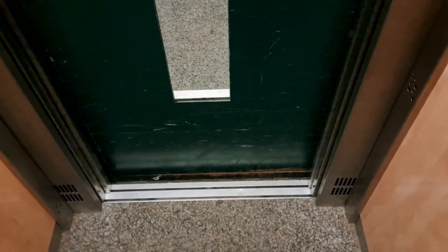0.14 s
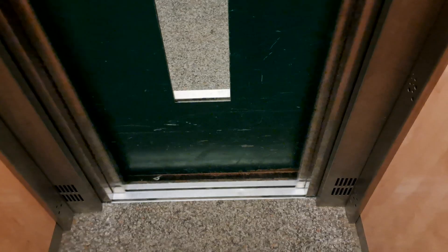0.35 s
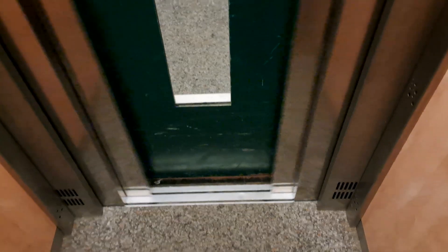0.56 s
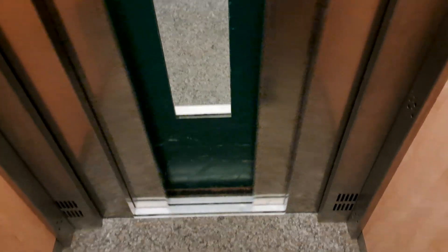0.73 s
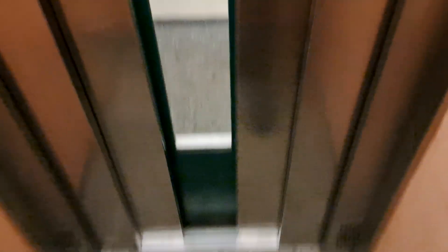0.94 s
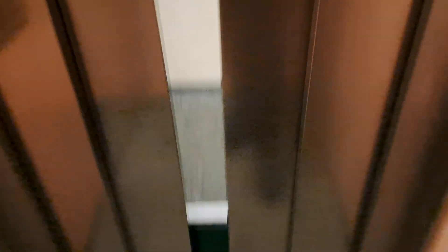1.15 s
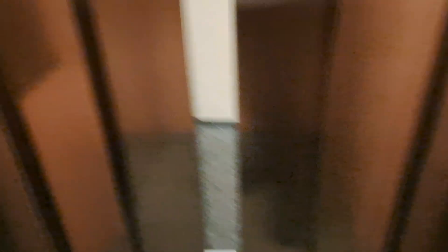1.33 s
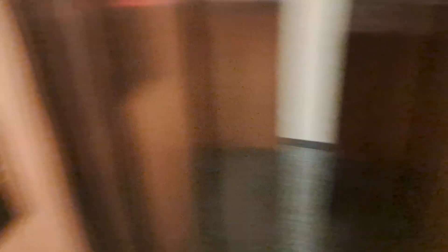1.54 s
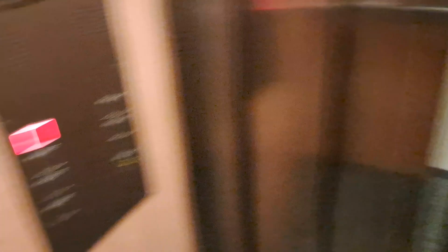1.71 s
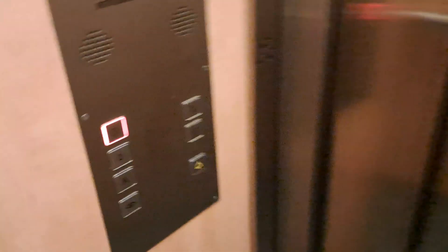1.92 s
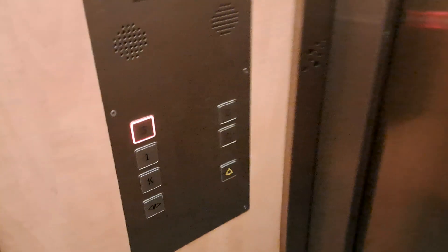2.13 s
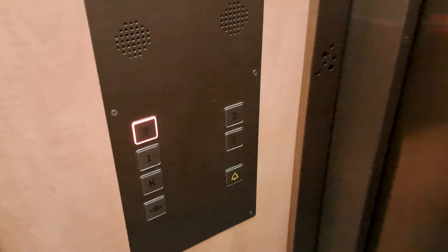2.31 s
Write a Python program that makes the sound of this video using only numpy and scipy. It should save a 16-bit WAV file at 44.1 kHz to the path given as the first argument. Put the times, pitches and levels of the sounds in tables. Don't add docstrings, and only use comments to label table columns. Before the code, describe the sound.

Inside a small lift car, microphone at arm's length from the door, a metal latch clacks sharply, steel panels rumble and rattle shut with small squeaks and rubbing, then meet with a low thud over faint air noise.

```python
import sys
import numpy as np
from scipy import signal
from scipy.io import wavfile
from scipy.ndimage import uniform_filter1d

SR = 44100
rng = np.random.default_rng(int(sys.argv[2]) if len(sys.argv) > 2 else 0)


def to_linear_factor(level_db):
    exponent = np.asarray(level_db, float) / 20
    return 10 ** exponent


def file_out(sig):
    cols = np.atleast_2d(sig).T
    lim = np.clip(cols, -1, 1)
    pcm = np.round(lim * 32767).astype(np.int16)
    wavfile.write(sys.argv[1], SR, pcm)


N = 108706
TOP_HZ = 15800

# f/Hz, likeness/0-1
STEREO_LIKENESS = [(50, 1), (200, 0.87), (400, 0.82), (800, 0.44), (2000, 0.033), (8000, 0.018)]


def evened(x):
    return x / np.sqrt(np.mean(x ** 2) + 1e-20)


def read(points, hz):
    f, value = np.transpose(points)
    return np.interp(np.log(hz + 1), np.log(f + 1), value)


def curve(rows, column):
    rows = np.array(rows)
    return np.interp(np.arange(N) / SR, rows[:, 0], rows[:, column])


def drift(rate_hz):
    t = np.arange(N) / SR
    rates = rate_hz * np.geomspace(.1, 1, 12)
    return evened(sum(np.sin(2 * np.pi * (f * t + rng.random())) for f in rates))


def resonate(x, hz, width_hz):
    turn = np.exp(2j * np.pi * np.cumsum(hz * np.ones(x.shape[-1])) / SR)
    r = np.exp(-np.pi * width_hz / SR)
    return 2 * (turn * signal.lfilter([1 - r], [1, -r], x / turn)).real


def hiss(tone, length, size, patchy_db, t60=None):
    # f/Hz, level/dB
    left_right = [(60, 1.5), (170, -5), (400, 3.5), (1500, -8), (5000, 5), (12000, 3)]
    frames, hz = length * 4 // size + 5, np.fft.rfftfreq(size, 1 / SR)
    a, b, c, d, patches = rng.standard_normal((frames, len(hz), 5)).T
    patches = uniform_filter1d(patches, size=size // 128 + 1, axis=0)
    patches = evened(uniform_filter1d(patches, size=8, axis=1))

    same = np.clip(read(STEREO_LIKENESS, hz), -1, 1)[:, None]
    left = a + 1j * b
    right = same * left + np.sqrt(1 - same ** 2) * (c + 1j * d)
    z = np.array([left, right])

    gain = to_linear_factor(read(tone, hz)) * (hz > .8 * tone[0][0]) * (hz < TOP_HZ)
    z *= gain[:, None] / np.sqrt(np.mean(gain ** 2)) * to_linear_factor(patchy_db * patches)
    z *= to_linear_factor(np.outer([.5, -.5], read(left_right, hz)))[:, :, None]
    if t60:
        frame_s = np.arange(frames) * size / 4 / SR
        z *= to_linear_factor(-60 * frame_s / read(t60, hz)[:, None])
    return signal.istft(z, nperseg=size, noverlap=size * 3 // 4)[1][:, :length] / np.sqrt(size / 3)


def background():
    # f/Hz, level/dB per Hz
    air_tone = [(18, 4), (30, -2), (55, 4.5), (100, 0), (140, -17), (669, -31), (2280, -31), (3300, -66),
                (6000, -69), (14300, -43.5)]
    # f/Hz, level/dB
    lamp = [(14277, -69)]
    air = to_linear_factor(-41) * evened(hiss(air_tone, N, size=2048, patchy_db=4.0))
    hz, db = lamp[0]
    phase = 2 * np.pi * np.cumsum(hz + 3 * drift(rate_hz=3)) / SR
    whine = np.sin(phase + np.array([[0], [1.2]]))
    return air + np.sqrt(2) * to_linear_factor(db + 1.5 + 1.2 * drift(rate_hz=4)) * whine


def boom():
    # t/s, first body mode level/dB, second mode relative to it/dB
    shake = [(0, -40.5, 6.5), (.05, -24.5, -25), (.13, -41.5, -22), (.2, -35.5, -11), (.3, -50, -10.5),
             (.45, -32, -12), (.6, -29, -13), (.78, -35, -9), (.9, -30.5, 1), (.99, -32.5, -1.5),
             (1.06, -33, -11), (1.2, -29, -12.5), (1.4, -35, -7), (1.47, -43, -6.5), (2.1, -51, -5.5),
             (2.13, -26, 3), (2.23, -18.5, -7), (2.3, -27, -14)]
    # t/s, level relative to the first body mode/dB
    sway = [(1.0, -15), (1.15, -11.5), (1.45, -4), (2.05, -5.5), (2.15, -24)]
    wander_hz, flutter_db = 1.12, 3
    modes = (32, curve(sway, column=1)), (53.2, 0), (82.76, curve(shake, column=2))  # (f/Hz, relative dB)
    db = curve(shake, column=1)
    out = 0
    for hz, rel_db in modes:
        phase = 2 * np.pi * np.cumsum(hz + wander_hz * drift(rate_hz=8.02)) / SR
        level = to_linear_factor(db + rel_db + flutter_db * drift(rate_hz=14))
        out = out + np.sqrt(2) * level * np.sin(phase + np.array([[.04], [0]]))
    return out * to_linear_factor([[.65], [-.65]])


def rolling():
    # t/s, level/dB
    effort = [(0, -41.5), (.1, -59.5), (.2, -47.5), (.3, -40), (.45, -39.5), (.6, -36), (.85, -33),
              (1, -38), (1.2, -42.5), (1.4, -50), (1.48, -59), (1.9, -62.5), (2.08, -55), (2.299, -57),
              (2.46, -56)]
    # f/Hz, width/Hz, level/dB
    panel = [(160.5, 23, -3.5), (180.7, 11, -11.5), (275.9, 14, -3.5), (300, 18.2, -1.5), (334, 36, -18),
             (399.8, 10.2, -7), (528, 49, -14), (665, 68, -14), (780, 170, -9.5)]
    # f/Hz, level/dB per Hz
    wash_tone = [(53, -2), (90, 0.5), (211, -35), (288, -5), (470, -15.5), (4500, -37), (5850, -42),
                 (9900, -120)]
    # t/s, f/Hz, load/dB
    mesh = [(.25, 580, -17), (.4, 594, 5), (.55, 595, 6), (.69, 646, 6.5), (.72, 586, 8), (.86, 610, 3.5),
            (1.1, 614.4, 2), (1.3, 624, 0.5), (1.5, 610, 9.5), (1.6, 610, -23)]
    # multiple of mesh f, level/dB
    mesh_orders = [(2, -16), (3, -13)]
    bumps_per_s, bump_spread_db, bump_share = 360, 3.5, 0.53
    panel_wander = .03

    bumps = to_linear_factor(bump_spread_db * np.minimum(rng.exponential(1, N), 4))
    bumps = bumps * (rng.random(N) < bumps_per_s / SR) * rng.choice([-1, 1], N)
    drive = (1 - bump_share) * rng.standard_normal(N) + bump_share * evened(bumps)
    apart, out = rng.standard_normal((2, N)), np.zeros((2, N))
    for hz, width_hz, db in panel:
        same = np.clip(read(STEREO_LIKENESS, hz), 0, 1)
        hz = hz * (1 + panel_wander * drift(rate_hz=5.033))
        push = np.sqrt(same) * drive + np.sqrt(1 - same) * apart
        out += to_linear_factor(db) * evened(resonate(resonate(push, hz, width_hz), hz, 4 * width_hz))
    for k, db in mesh_orders:
        hum = resonate(.5 * drive + apart, k * curve(mesh, column=1), width_hz=34)
        out += to_linear_factor(db + curve(mesh, column=2)) * evened(hum)
    out += to_linear_factor(1) * evened(hiss(wash_tone, N, size=1024, patchy_db=4.5))
    return to_linear_factor(curve(effort, column=1) - 2.5) * out


def squeaks():
    # t/s, length/s, level/dB, start f/Hz, end f/Hz
    whistles = [(.094, .034, -55, 10250, 10200), (.108, .075, -47, 8900, 8050),
                (.158, .045, -49, 8050, 7500), (.2, .085, -51, 8080, 8050), (.52, .07, -55, 5000, 5000),
                (.522, .02, -53, 8750, 8750), (.59, .05, -48, 7500, 8300), (.625, .025, -47, 8700, 9200),
                (.635, .05, -45, 8400, 7500), (.67, .035, -49, 3900, 4100), (.64, .04, -54, 2750, 2750),
                (.72, .03, -55, 3700, 3650), (.765, .035, -48, 6500, 6450), (.83, .05, -55, 5400, 5450),
                (.875, .025, -55, 9900, 9700), (.925, .045, -57, 10000, 10000), (.97, .03, -60, 6450, 6450),
                (.985, .025, -60, 6950, 6950), (1.025, .025, -58, 5200, 5200), (1.03, .03, -57, 3150, 3150),
                (1.035, .015, -59, 6450, 6450), (1.48, .04, -62, 2280, 2320)]
    width_hz, fuzz_share = 200, .55
    out = np.zeros((2, N))
    for start, length, db, hz0, hz1 in whistles:
        u = np.linspace(0, 1, int(length * SR))
        hz = hz0 + (hz1 - hz0) * u
        noise = rng.standard_normal((2, len(u)))
        fuzz = evened(resonate(resonate(noise, hz, width_hz), hz, 2 * width_hz))
        tone = np.sqrt(2) * np.sin(2 * np.pi * np.cumsum(hz) / SR + rng.uniform(0, 1, (2, 1)))
        shape = np.sin(np.pi * u) ** .5
        whistle = (1 - fuzz_share) * tone + fuzz_share * fuzz
        out[:, round(start * SR):][:, :len(u)] += to_linear_factor(db) * shape * whistle
    return out


def rubbing():
    # t/s, level/dB, brightness/0-1
    rub = [(.196, -68, 0.8), (.208, -47.5, 0.23), (.48, -47.5, 0.04), (.56, -40, 0.24), (.66, -39.5, 0.2),
           (.9, -46.5, 0.26), (.94, -55.5, 0.2), (1.05, -56, 0.3), (1.2, -53.5, 0.75), (1.47, -53.5, 0.34),
           (1.54, -65.5, 0.1), (1.64, -61.5, 0.3), (1.72, -53, 0.75), (1.9, -52, 0.86), (2.0, -54, 0.5),
           (2.08, -58, 0.2), (2.25, -62, 0.7)]
    # f/Hz, level/dB per Hz
    dull_tone = [(1470, 2), (2500, -1.5), (2800, 2), (3550, -4.5), (8000, 0), (15600, -17)]
    # f/Hz, level/dB per Hz
    bright_tone = [(1470, -8.5), (2500, -5), (3070, -17.5), (4080, -7), (13300, 1.5), (15600, -16)]
    bright = np.clip(curve(rub, column=2), 0, 1)
    dull = evened(hiss(dull_tone, N, size=256, patchy_db=1.6))
    thin = evened(hiss(bright_tone, N, size=256, patchy_db=1.6))
    return to_linear_factor(curve(rub, column=1)) * (np.sqrt(1 - bright) * dull + np.sqrt(bright) * thin)


def ring(modes, rise_s, spread, strikes=((0, 0),)):
    t, out = np.arange(SR // 2) / SR, np.zeros((2, SR // 2))
    for delay, strike_db in strikes:
        at = round(abs(delay) * SR)
        sound = 0
        for hz, db, t60 in modes:
            apart = spread * rng.choice([-1, 1]) * np.array([[.5], [-.5]])
            wave = np.sin(2 * np.pi * hz * t + 6 * rng.random() + apart)
            sound = sound + to_linear_factor(strike_db + db - 60 * t / t60) * wave
        out[:, at:] += ((1 - np.exp(-t / rise_s)) * sound)[:, :len(t) - at]
    return out


def blows():
    blow_s = [
        .204,
        .33,
        .341,
        2.098,
        2.28,
    ]
    # level/dB, rise/s, left-right/dB, stretch of the car's decay
    cracks = [(-33, 0.002, 0, .65), (-29.5, 0.011, 6, 1.6), (-18.5, 0.004, -5, 0.55),
              (-30, 0.0035, 0, 1.39), (-52, 0.002, -4, 0.4)]
    # f/Hz, level/dB per Hz
    coupler_tone = [(180, -42), (300, -33), (1160, -7.5), (2210, 7), (2880, -0.5), (3460, -7.5),
                    (9640, -21), (15600, -18)]
    latch_tone = [(120, -68), (200, -3), (586, -5.5), (1310, -7.5), (1630, -2), (3250, -16), (7650, -12.5),
                  (15600, -23)]
    meet_tone = [(65, -30), (140, -2.5), (351, -10), (700, -19), (1400, -27.5), (2360, -22.5), (3400, -33),
                 (5500, -28), (15600, -40)]
    # f/Hz, t60/s
    car_t60 = [(250, 0.5), (700, 0.51), (2000, 0.37), (7000, 0.16), (14000, 0.17)]
    # f/Hz, level/dB, t60/s
    coupler_ring = [(560, -40, .3), (660, -41, .2), (1405, -38, .2), (1836, -34, .13), (2110, -25, 0.17),
                    (2040, -30, 0.12), (2455, -25, 0.05), (2810, -33, 0.08)]
    latch_ring = [(325, -32.5, 0.31), (393.8, -22.5, 0.29), (540, -18, 0.1), (652, -23, 0.18),
                  (876, -29.5, 0.12), (1064, -35, .25), (1430, -28, 0.18), (1583, -10, 0.073),
                  (1802, -12, 0.051), (1900, -21, 0.19), (2135, -26, 0.1), (2850, -24, 0.15),
                  (3400, -29, 0.094), (3745, -31.5, 0.16)]
    thud_ring = [(151, -37, 0.64), (190, -33, 0.083), (240, -31.5, 0.4), (290.8, -22.5, 0.3),
                 (334.4, -25.5, 0.35), (350.3, -17.5, 0.14), (445, -40, 0.1), (484, -37.5, .3),
                 (610, -33, 0.085), (682, -32, 0.1), (730, -44.5, .25), (880, -44, 0.17), (1107, -47, 0.23)]
    settle_ring = [(2050, -45, .07), (2300, -50, .05)]
    # delay/s, level/dB
    coupler_strikes = [(.001, -4), (.007, -1), (.018, -2), (.052, -9), (.079, -13)]
    latch_strikes = [(.001, -1), (.012, -6), (.033, -16)]
    thud_strikes = [(.004, -3), (.022, 0), (.052, -5), (.078, -12), (.105, -11)]
    snap_gain, snap_s = 0.34, 0.02

    out = np.zeros((2, N + SR))
    t = np.arange(SR // 2) / SR
    tones = coupler_tone, latch_tone, latch_tone, meet_tone, coupler_tone
    rings = coupler_ring, None, latch_ring, None, settle_ring
    rebounds = coupler_strikes, None, latch_strikes, None, [(0, 0)]
    for s, crack, tone, modes, strikes in zip(blow_s, cracks, tones, rings, rebounds):
        db, rise, left_db, stretch = crack
        t60 = [(hz, stretch * v) for hz, v in car_t60]
        onset = 1 - np.exp(-(t / rise) ** 2)
        sound = to_linear_factor(db) * onset * hiss(tone, len(t), size=256, patchy_db=1.2, t60=t60)
        sound = sound * (1 + snap_gain * np.exp(-t / snap_s))
        if modes:
            sound = sound + ring(modes, .002, spread=1.4, strikes=strikes)
        out[:, round(s * SR):][:, :len(t)] += sound * to_linear_factor(np.array([[.5], [-.5]]) * left_db)
    thud = ring(thud_ring, rise_s=.005, spread=0.53, strikes=thud_strikes)
    out[:, round(blow_s[3] * SR):][:, :len(t)] += thud
    return out[:, :N]


def joints():
    # t/s, level/dB, panel tuning/ratio
    crossings = [(0.443, -34, 1.23), (0.489, -25.5, 1.0), (0.531, -25.5, 1.0), (.606, -24.5, .97),
                 (.659, -23, 0.96), (.72, -29, 0.92), (.818, -20, .9), (.87, -26, 1.08), (0.921, -29, 1.1),
                 (1.019, -30.5, 1.04), (1.145, -28, 1.0), (1.231, -29, 0.87), (1.37, -48, 0.93)]
    # f/Hz, level/dB, t60/s
    knock_ring = [(162.7, -6.5, 0.15), (298, -0.5, 0.15), (347.4, -15.5, 0.13), (410, -10, 0.055)]
    out = np.zeros((2, N))
    for s, db, tuning in crossings:
        modes = [(hz * tuning, *rest) for hz, *rest in knock_ring]
        out[:, round(s * SR):][:, :SR // 2] += to_linear_factor(db) * ring(modes, rise_s=0.0067, spread=0.41)
    return out


def scene():
    return background() + boom() + rolling() + squeaks() + rubbing() + blows() + joints()


def top_cut(x):
    return signal.sosfilt(signal.butter(12, 15710, fs=SR, output="sos"), x)


def record(dry):
    return top_cut(dry)


dry = scene()
out = record(dry)
file_out(out)
```